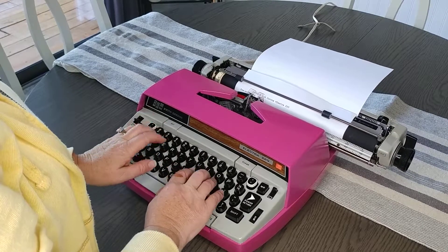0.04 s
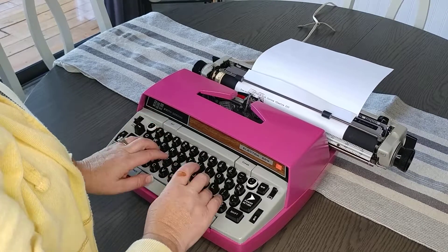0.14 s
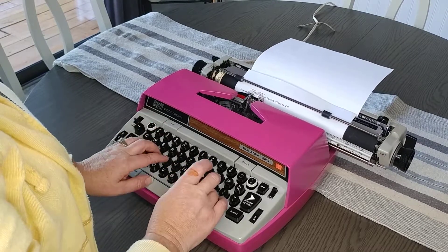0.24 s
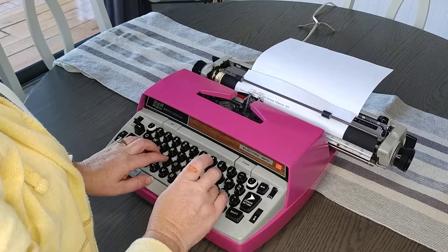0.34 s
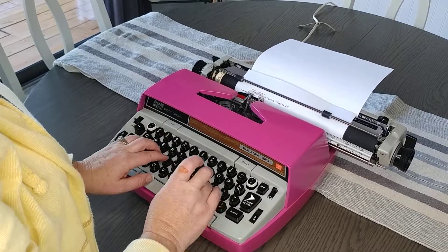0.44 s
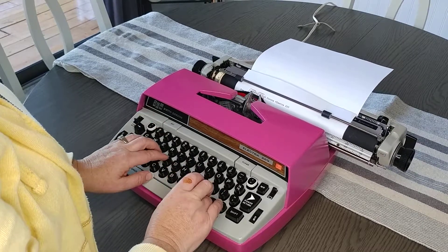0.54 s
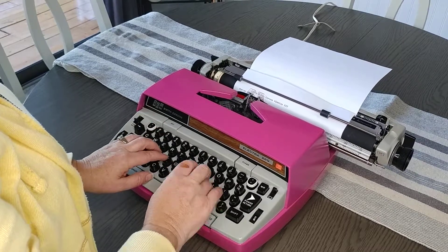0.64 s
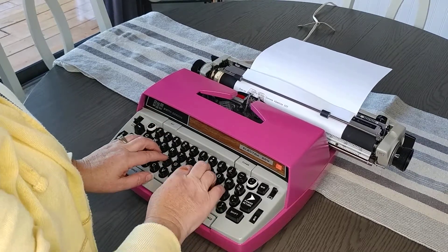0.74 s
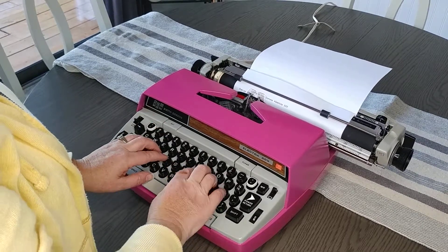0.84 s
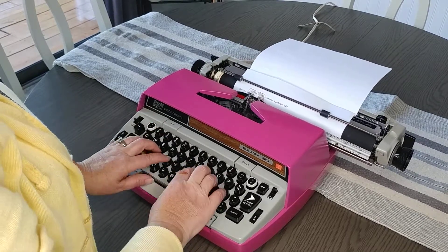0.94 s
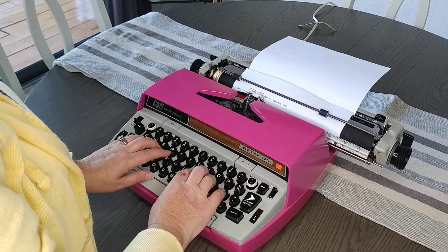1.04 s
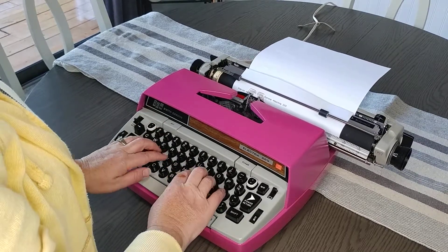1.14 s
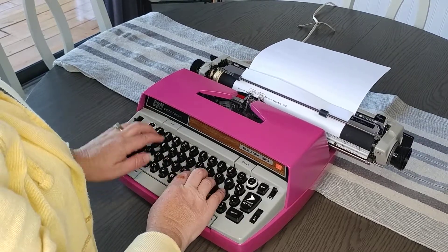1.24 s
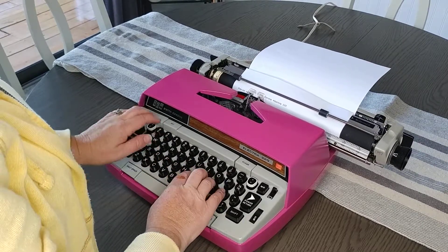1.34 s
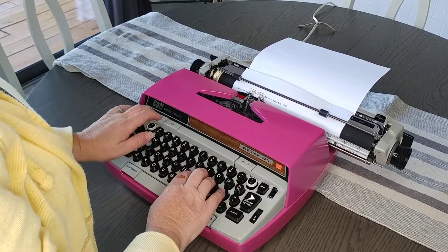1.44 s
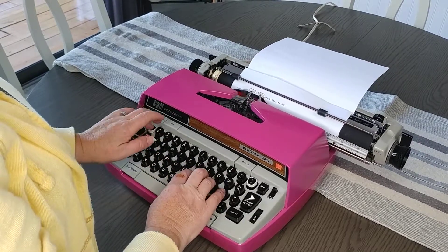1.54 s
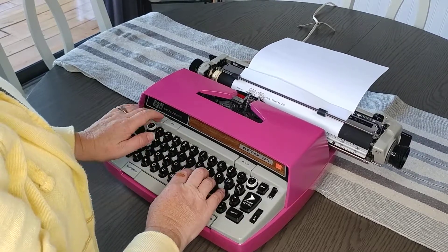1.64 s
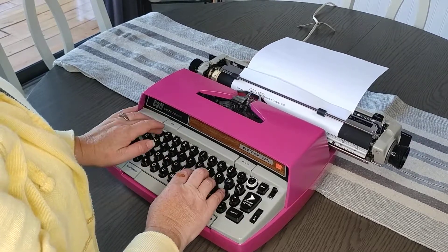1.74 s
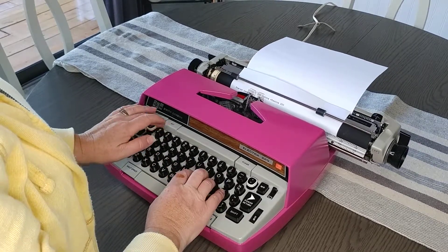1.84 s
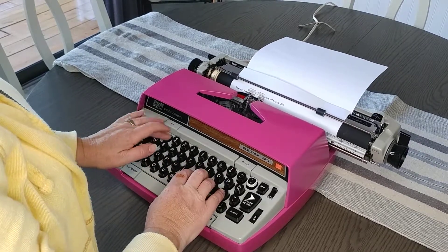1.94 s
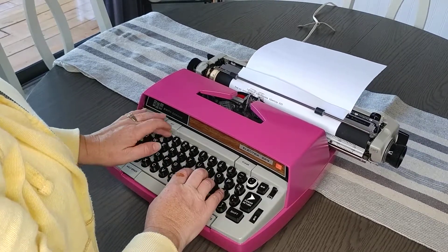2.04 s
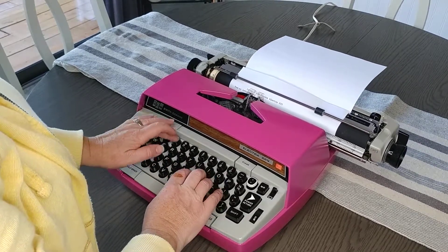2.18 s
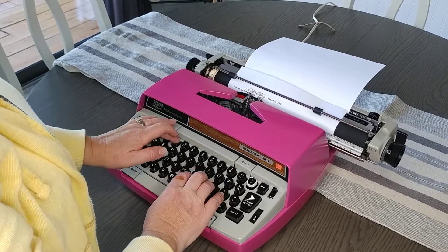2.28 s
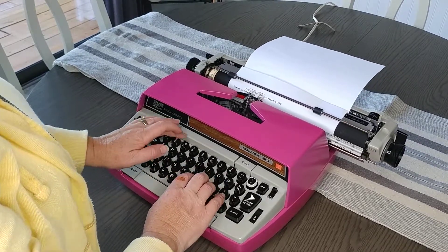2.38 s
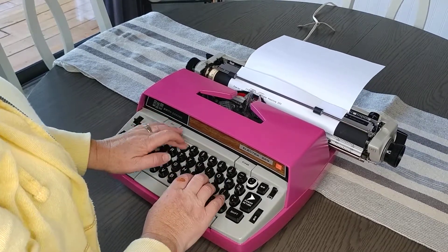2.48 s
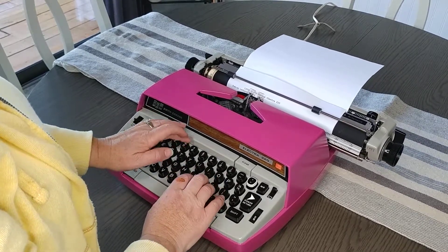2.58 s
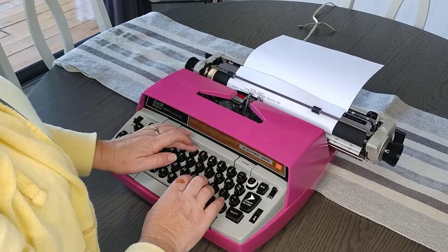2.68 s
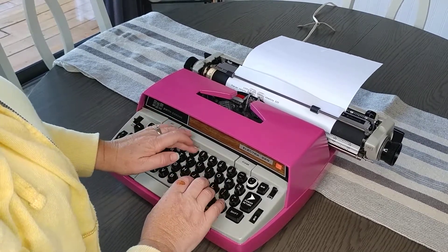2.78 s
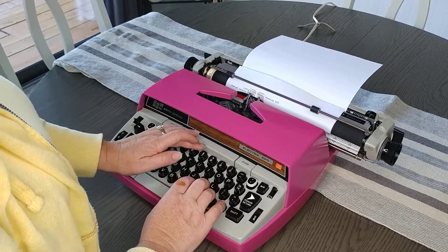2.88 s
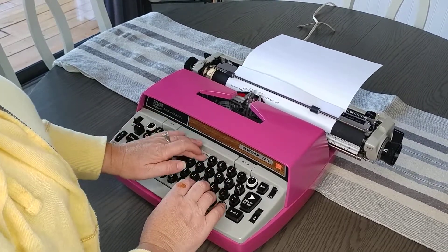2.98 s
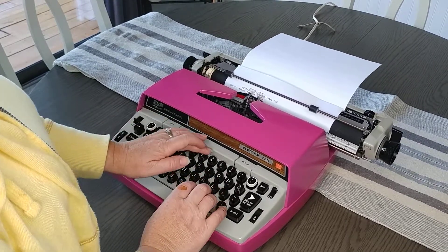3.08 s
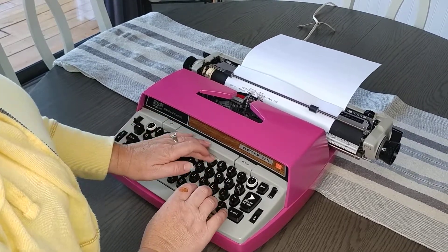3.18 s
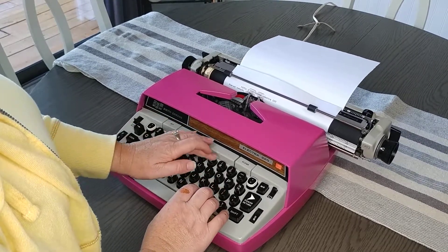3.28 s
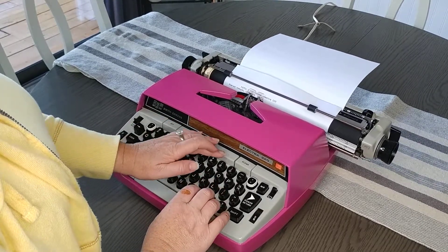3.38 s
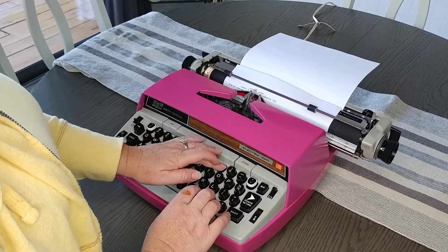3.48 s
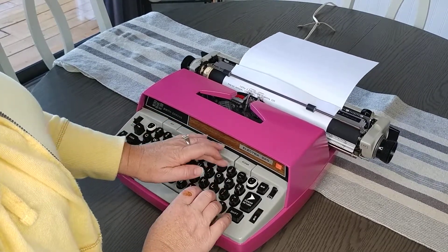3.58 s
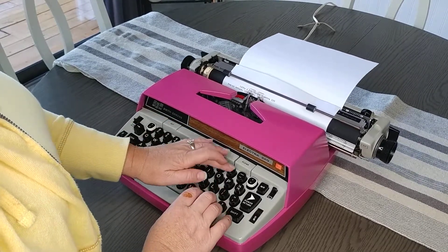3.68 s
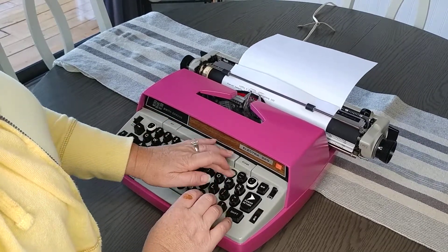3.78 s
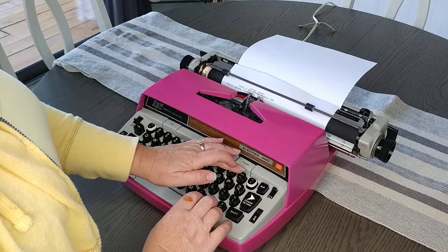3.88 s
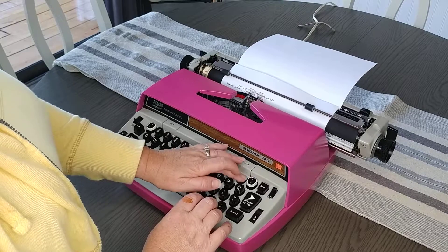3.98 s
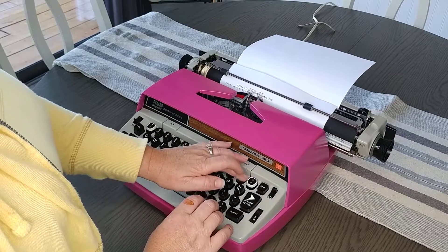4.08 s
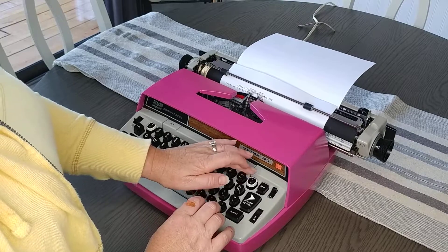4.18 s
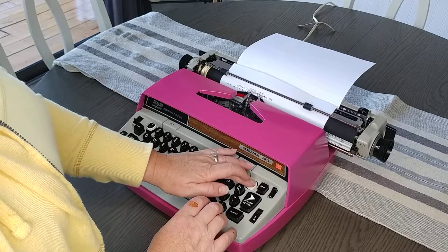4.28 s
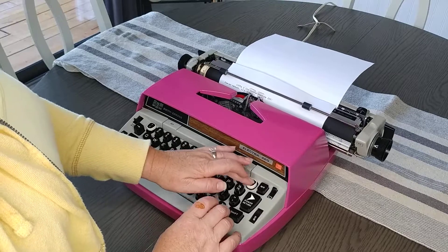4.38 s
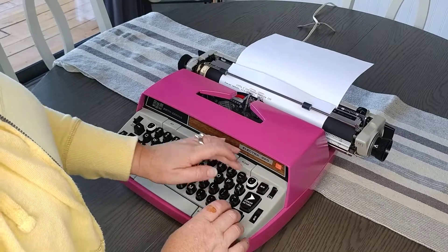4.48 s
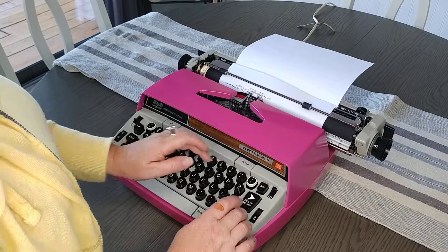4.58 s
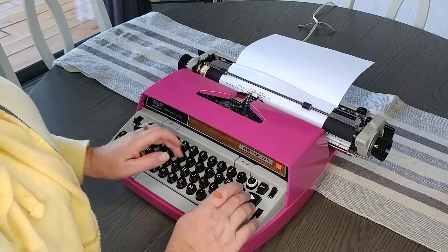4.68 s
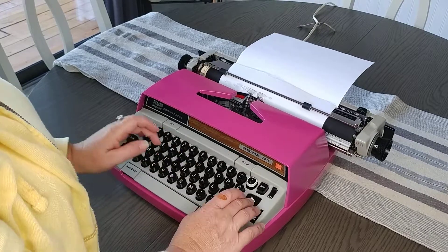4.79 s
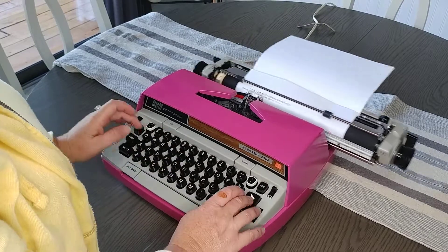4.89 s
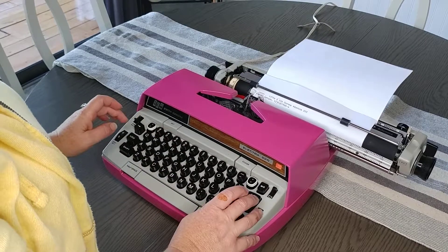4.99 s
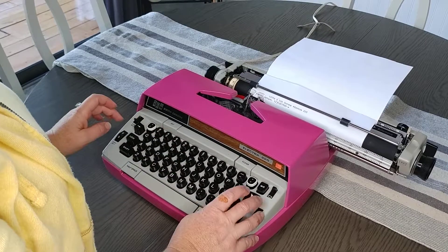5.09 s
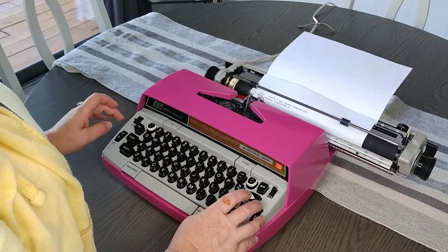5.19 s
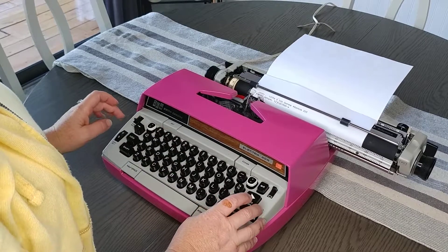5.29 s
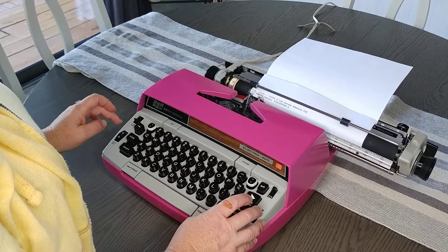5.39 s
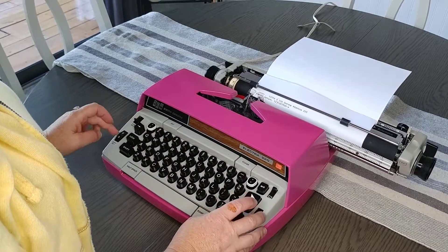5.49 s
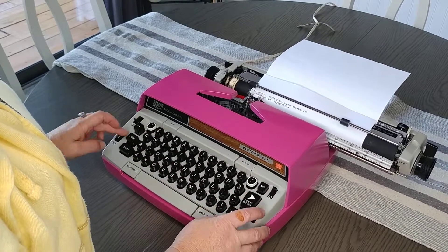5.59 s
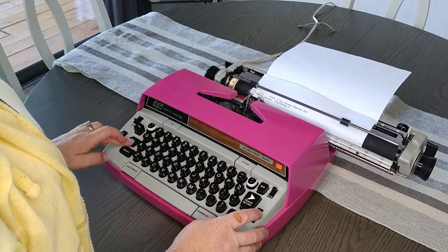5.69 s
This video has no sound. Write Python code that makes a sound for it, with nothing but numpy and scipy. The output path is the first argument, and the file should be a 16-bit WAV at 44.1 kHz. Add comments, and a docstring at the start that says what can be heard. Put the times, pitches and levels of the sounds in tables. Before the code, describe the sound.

Close stereo typing on a humming electric typewriter, bright cracking keystrokes with small table thuds, ending in a heavy, quick motorised carriage return.

```python
"""A steady motor hum under the dying ring of a type bar's slap: an electric typewriter in a quiet, bare room.
Then one letter, a space, a word of twelve letters and the powered carriage return.
Each key trips a cam that throws a type bar at the platen; the carriage steps on and shakes the table.
The lid shields the type bars, so most of the slap arrives by ceiling and walls.
Blows are noise shaped by echoes and part colours; steel, frame and table ring as damped sines."""
import sys
import numpy as np
from scipy import signal
from scipy.fft import rfft, irfft, next_fast_len
from scipy.io import wavfile
from scipy.ndimage import map_coordinates

SR = 44100
rng = np.random.default_rng(int(sys.argv[2]) if len(sys.argv) > 2 else 0)


def store_wav(level_fs):
    """Save 16-bit WAV to argv[1]."""
    pcm = np.round(np.clip(np.atleast_2d(level_fs), -1, 1) * 32767)
    wavfile.write(sys.argv[1], SR, pcm.T.astype(np.int16))


N = 252693  # samples in the scene
LEAD = SR // 4  # samples of run-up, for a stroke that is still ringing at the start
RING = 2 ** 15  # samples in the sound of one blow
HZ = np.fft.rfftfreq(RING, 1 / SR)
AGE = np.arange(RING) / SR  # seconds into a blow
BLOW_SCALE = np.sqrt(SR / 10 / RING)  # takes rms 1 over RING to the energy of a tenth of a second at rms 1


def amp(db):
    """Decibels to gain."""
    return 10 ** (np.asarray(db) / 20)


def unit(x):
    """Scale to rms 1."""
    return x / np.sqrt(np.mean(x ** 2) + 1e-20)


def along(points, hz):
    """(Hz, value) points read on a log axis."""
    f, v = np.transpose(points)
    return np.interp(np.log(hz + 1), np.log(f + 1), v)


def add(track, s, sound):
    """Mix a sound into a track at time s, fading out its far end."""
    part = track[:, LEAD + round(s * SR):][:, :RING]
    faded = sound * np.minimum(1, 10 * (AGE[-1] - AGE))
    part += faded[..., :part.shape[1]]


def wobble(rate):
    """A smooth random curve, rate knots a second."""
    knots = rng.standard_normal(int(N * rate / SR) + 4)
    return map_coordinates(knots, [np.arange(N) * rate / SR])


def ripple(width_hz):
    """A smooth random curve over frequency: resonances that one part does not share with its neighbours."""
    return map_coordinates(rng.standard_normal(400), [HZ / width_hz], mode="mirror")


# How alike the two sides are. Each row: frequency in Hz, left-right likeness (1 is identical).
ALIKE = [(60, 0.94), (130, 0.95), (280, 0.91), (600, 0.63), (1200, 0), (2400, 0), (12000, 0)]


def two_ports(size):
    """White noise at two close microphones: alike in the bass, unrelated in the treble."""
    likeness = along(ALIKE, np.fft.rfftfreq(size, 1 / SR))
    turn = np.arccos(np.clip(likeness, -1, 1)) / 2
    noise = rfft(rng.standard_normal((2, size)))
    mid, side = irfft(noise * [np.cos(turn), np.sin(turn)], size)
    return np.array([mid + side, mid - side])


def rush(spectrum):
    """Steady stereo noise of rms 1."""
    size = next_fast_len(N)
    colour = amp(along(spectrum, np.fft.rfftfreq(size, 1 / SR)))
    return unit(irfft(rfft(two_ports(size)) * colour, size)[:, :N])


# The room's fading. Each row: frequency in Hz, time to fall 60 dB in seconds.
ROOM = [(200, 0.74), (530, 0.52), (1400, 0.45), (3700, 0.37), (9000, 0.29), (13000, 0.24)]
# Room plus ringing type bars. Each row: frequency in Hz, time to fall 60 dB in seconds.
BASKET = [(200, 0.61), (1400, 0.41), (3000, 0.51), (4500, 0.47), (6200, 0.45), (7400, 0.41), (9000, 0.42),
          (13000, 0.28)]
CEILING_S = 0.011  # delay of the ceiling's echo


def path(decay, direct_db, early_db, ceiling_db, contact=0.0012, blur=0.0077):
    """One contact as heard in the room: a direct snap, near echoes, the ceiling, then the tail."""
    hz, t, z = signal.stft(two_ports(RING), SR, nperseg=256)
    fading = amp(-60 * t / along(decay, hz)[:, None])
    tail = signal.istft(z * fading, SR, nperseg=256)[1][:, :RING]
    direct = amp(direct_db) * np.exp(-(AGE / contact) ** 4)
    arrived = (1 + np.tanh((AGE - CEILING_S) / blur)) / 2
    near = amp(early_db) * (1 - arrived)
    echoes = arrived * (1 + amp(ceiling_db) * np.exp(-abs(AGE - CEILING_S) / 0.004))
    return unit(tail * (direct + near + echoes))


# Resonances of frame and case. Each row: frequency in Hz, width in Hz, height in dB over the broad response.
CASE = [(388.8, 50, 0), (492, 134, 5), (820, 47, 7), (1164, 73, 3), (1510, 240, 1.5), (1694, 53, 5.5),
        (2757, 470, 4)]


def body(spectrum, knock_db=0):
    """Gain of a part mounted in the resonant case; a heavier knock drives lows and low mids harder."""
    bumps = sum(db / (1 + (2 * (HZ - hz) / width) ** 2) for hz, width, db in CASE)
    colour = unit(amp(along(spectrum, HZ) + bumps))
    return colour * amp(knock_db / (1 + (HZ / 1600) ** 4))


# Stereo balance of every blow. Each row: frequency in Hz, left minus right in dB.
LEFT = [(500, 0.5), (2500, 0), (5000, 0.8), (8500, 2.5), (12000, -0.5)]


def blow(route, gain):
    """A contact with a causal colour; at unit gain its energy equals a tenth of a second at rms 1."""
    # folding the cepstrum gives the gain minimum phase, so nothing sounds before the contact
    cepstrum = irfft(np.log(np.maximum(gain, 1e-6)))
    cepstrum[1:RING // 2] *= 2
    cepstrum[RING // 2 + 1:] = 0
    balance = amp(np.array([[.5], [-.5]]) * along(LEFT, HZ))
    return irfft(rfft(route) * np.exp(rfft(cepstrum)) * balance) * BLOW_SCALE


def ring(modes, attack, scatter_db):
    """Damped modes of (Hz, dB, t60 s); each blow scatters their strengths by scatter_db."""
    tones = 0
    for hz, db, t60 in modes:
        level = amp(db + scatter_db * rng.normal() - 60 * AGE / t60)
        tones = tones + level * np.sin(2 * np.pi * hz * AGE)
    return tones * (1 - np.exp(-AGE / attack))


# Hum of motor and drive. Each row: frequency in Hz, level in dB rms before its slow wobble.
HUM = [(59.6, -50), (120, -48), (182, -58), (240, -63.5), (520, -70.5), (1032, -82)]
# Colour of drive rumble and room air. Each row: frequency in Hz, level in dB per Hz.
AIR = [(12, -4.5), (25, -2.5), (40, -6), (70, -11.5), (100, -21), (200, -18), (300, -27.5), (500, -29.5),
       (700, -34.5), (1000, -41), (2000, -49.5), (3500, -54), (9000, -55), (11000, -63.5)]
AIR_DB = -43.5


def motor():
    """Steady hum lines over the rumble of the drive and the room's air."""
    t = np.arange(N) / SR
    lines = 0
    for hz, db in HUM:
        level = amp(db + 1.1 * wobble(21))
        phase = 2 * np.pi * (hz * t + rng.random()) + 0.24 * wobble(7.7)
        lines = lines + level * np.sin(phase)
    return np.sqrt(2) * lines + amp(AIR_DB) * rush(AIR)


# Type bars hitting the platen. Each row: slap time in seconds, level in dB, extra steel ring in dB.
STROKES = [(-.1, -16.5, -2), (0.654, -20, -11), (1.613, -16.5, -0.5), (1.8253, -14.5, 1.5),
           (2.084, -15, 0.5), (2.3291, -15.5, -0.3), (2.5735, -14, -1), (2.832, -13.5, -0.5),
           (3.078, -14.5, 0), (3.322, -14.5, -1.1), (3.5815, -14.5, -1.5), (3.8553, -16.5, -1),
           (4.117, -19, -5.5), (4.3993, -16, -7)]
# Colour of keys and levers. Each row: frequency in Hz, level in dB per Hz.
LEVERS = [(60, 4.5), (200, -4), (500, -4), (1200, -1), (2000, -3.5), (3500, -4), (7000, -7), (9000, 1),
          (10500, -14.5), (12000, -8.5), (15500, -13.5)]
KEY_LEAD_S, KEY_DB, KEY_KNOCK_DB = .0325, -42, -2  # an unhurried key: lead on the slap, level, woodiness
HURRY_GAP_S, HURRY_POWER = .213, 11  # a key this soon after the last is fully hurried; fading for longer gaps
HURRY_DB, HURRY_KNOCK_DB = 6, 7.5  # what full hurry adds to level and woodiness


def keys(track):
    """A finger knocks the key down just before its bar lands; the sooner after the last, the firmer and woodier."""
    times = np.transpose(STROKES)[0]
    gaps = np.diff(times, prepend=-np.inf)
    hurries = np.minimum(1, HURRY_GAP_S / gaps) ** HURRY_POWER
    for s, hurry in zip(times, hurries):
        route = path(ROOM, direct_db=-9, early_db=6, ceiling_db=-15)
        gain = body(LEVERS, KEY_KNOCK_DB + HURRY_KNOCK_DB * hurry)
        add(track, s - KEY_LEAD_S, amp(KEY_DB + HURRY_DB * hurry) * blow(route, gain))


# Type bars ringing in their basket. Each row: frequency in Hz, relative level in dB.
STEEL = [(5136, -43), (5211, -50), (5464, -47.5), (5615, -41.5), (5722, -42.5), (5927, -45.5), (6158, -32),
         (6202, -44), (6934, -51), (7946, -43.5), (8075, -36.5), (8581, -41.5), (8829, -47), (9033, -45.5),
         (9179, -52), (9615, -39.5)]


def steel_ring(t60, scatter_db):
    """The bars' thin lines, at new strengths in each ear; energy of a tenth of a second at rms 1."""
    hz, db = np.transpose(STEEL)
    tones = np.sin(2 * np.pi * (hz[:, None] * AGE + rng.random((len(hz), 1))))
    strengths = amp(db + scatter_db * rng.standard_normal((2, len(hz))))
    pair = strengths * rng.choice([-1, 1], (2, len(hz))) @ tones
    swell = 1 - np.exp(-AGE / 0.025)
    return unit(pair * amp(-60 * AGE / t60) * swell) * BLOW_SCALE


# Colour of a slap. Each row: frequency in Hz, level in dB per Hz.
SLAP = [(60, -25), (200, -26.5), (600, -22), (2200, -14.5), (3000, -11.5), (4300, -10), (5300, -4),
        (6150, 0.5), (7200, -7), (8400, 1.5), (9500, -3.5), (10600, -24), (11600, -16.5), (15500, -17)]
SNAP_DB = -26.5  # type meeting paper: the motor throws every bar equally hard
SNAP_ECHO_S, SNAP_ECHO_DB, SNAP_SPREAD_S = .0135, -10, 0.0031  # snap off the ceiling: delay, level, smear


def type_bars(track):
    """All bars strike the same spot, so slaps share snap and echo pattern; each bar has its own colour."""
    platen = path(BASKET, direct_db=-5, early_db=-9, ceiling_db=-1, blur=.0015)
    steel = np.exp(-((HZ - 8700) / 1400) ** 2)
    echo = amp(SNAP_ECHO_DB) * np.exp(-((AGE - SNAP_ECHO_S) / SNAP_SPREAD_S) ** 2)
    snap = np.exp(-(AGE / .0013) ** 4) + echo
    for s, db, steel_db in STROKES:
        own_path = path(BASKET, direct_db=-4.5, early_db=-16.5, ceiling_db=-8.5)
        route = unit(platen + 0.82 * own_path)
        own_db = 1.3 * ripple(width_hz=260)
        add(track, s, amp(db) * blow(route, body(SLAP) * amp(steel_db * steel + own_db)))
        add(track, s, amp(db + steel_db - 14.5) * steel_ring(t60=0.39, scatter_db=-0.5))
        add(track, s, amp(SNAP_DB) * blow(unit(two_ports(RING) * snap), body(SLAP)))


CHATTER_DB, CHATTER_DB_PER_S = -23.5, 130.5  # level against the slap, fading
CHATTER_FROM_S, CHATTER_TO_S = .012, .11  # span after the slap


def chatter(track, count):
    """Each slap shakes loose levers, which tick a few times at random while it dies away."""
    gain = body(SLAP)
    for s, db, _ in STROKES:
        ticks = np.zeros((2, RING))
        for late in rng.uniform(CHATTER_FROM_S, CHATTER_TO_S, count):
            ticks += amp(-CHATTER_DB_PER_S * late) * np.exp(-((AGE - late) / .0005) ** 2)
        route = unit(ticks * two_ports(RING))
        add(track, s, amp(db + CHATTER_DB) * np.sqrt(count) * blow(route, gain))


# Machine on its feet and table top. Each row: frequency in Hz, level in dB, time to fall 60 dB in seconds.
TABLE = [(33.56, -25.5, 0.32), (54.6, -21, 0.14), (94.1, -40.5, 0.21), (134.6, -34, 0.24),
         (180.5, -38.5, 0.31)]


def thud(hard_db=0):
    """The machine rocks on its feet; a hard jolt drives the table's higher modes harder."""
    modes = [(hz, db + hard_db * (hz > 80), t60) for hz, db, t60 in TABLE]
    return -ring(modes, attack=0.0028, scatter_db=0.0)


# Trip lever, cam, ribbon lift, escapement, carriage stop, bar falling back.
# Each row: typical delay from the slap in seconds, typical level in dB, knock in dB.
LINKAGE = [(-.022, -45.5, 3), (-.014, -39, -9), (-.004, -37, -1.5), (.036, -32, 1), (.053, -31.5, -1),
           (.082, -40, -5.5)]
STEP_S = .064  # from a slap or a press of the space bar to the thud of the carriage's step


def linkage(track):
    """Levers click before and after each slap, each with its own knock; the carriage steps with a thud."""
    for delay, db, knock_db in LINKAGE:
        lever = path(ROOM, direct_db=-1.5, early_db=6.0, ceiling_db=4.5)
        for s, *_ in STROKES:
            own_path = path(ROOM, direct_db=-1.0, early_db=4.5, ceiling_db=-3.0)
            route = unit(lever + 0.66 * own_path)
            late = delay * (1 + .07 * rng.normal())
            own = amp(2.2 * ripple(width_hz=150))
            level = amp(db + 1.3 * rng.normal())
            add(track, s + late, level * blow(route, own * body(LEVERS, knock_db)))
    for s, *_ in STROKES:
        add(track, s + STEP_S + 0.0011 * rng.normal(), thud())


# A fingertip landing on a key. One row: start in seconds, level in dB.
TOUCH = (.599, -57)


def fingertip(track):
    """Before the next letter a fingertip lands on its key: a faint, quickly damped contact."""
    s, db = TOUCH
    route = unit(path(ROOM, direct_db=2, early_db=-3, ceiling_db=-9.5) * amp(-200 * AGE))
    add(track, s, amp(db) * blow(route, body(LEVERS, knock_db=-3.5)))


def bounces(s, db, knock_db, flight_s, loss_db, duller_db, count):
    """A contact and its rebounds, each weaker and duller: rows of (s, dB, knock dB)."""
    return [(s + k * flight_s, db - k * loss_db, knock_db + k * duller_db) for k in range(count)]


# Space bar pressed, then stopped by the carriage's step. Each row: start in seconds, level in dB, knock in dB.
SPACE = [(1.0327, -45.5, 1.5), (1.0909, -43, 4)]
SPACE_BOUNCE_S, SPACE_LOSS_DB, SPACE_DULLER_DB = .01, 2, 3.5  # its one bounce: flight, loss, added knock
SPACE_THUD_DB = -3


def space_bar(track):
    """The carriage steps without a type bar: light, hollow knocks of the long plastic bar, and the thud."""
    hollow = amp(5 / (1 + ((HZ - 1450) / 350) ** 2))
    for knock in SPACE:
        for s, db, knock_db in bounces(*knock, SPACE_BOUNCE_S, SPACE_LOSS_DB, SPACE_DULLER_DB, count=2):
            route = unit(path(ROOM, direct_db=-2, early_db=1.5, ceiling_db=-4.0) * amp(-70 * AGE))
            add(track, s, amp(db) * blow(route, hollow * body(LEVERS, knock_db)))
    add(track, SPACE[0][0] + STEP_S, amp(SPACE_THUD_DB) * thud())


# Colour of the carriage. Each row: frequency in Hz, level in dB per Hz.
CARRIAGE = [(150, -12.5), (350, -11.5), (600, -10), (900, -6.5), (1500, -5.5), (2000, -6.5), (2900, -9.5),
            (4000, -6.5), (6700, -7), (8700, 0.5), (10600, -13), (12700, -14), (15500, -16)]
# Carriage frame, rung by every clack.
# Each row: frequency in Hz, typical level in dB over the clack, time to fall 60 dB in seconds.
FRAME = [(378, -7.5, 0.089), (820, -2, 0.034), (1200, -2, .06), (1440, 2.5, 0.05)]


def clack(track, s, db, knock_db):
    """One contact on the exposed carriage, with a brief ring of its frame."""
    route = path(ROOM, direct_db=-2, early_db=3, ceiling_db=-10.5, contact=0.0039)
    add(track, s, amp(db) * blow(route, body(CARRIAGE, knock_db)))
    add(track, s, amp(db) * ring(FRAME, attack=0.0011, scatter_db=1.5))


# Line feed ratchet. Each row: frequency in Hz, relative level in dB, time to fall 60 dB in seconds.
RATCHET = [(1480, -6, 0.08), (1453, 0, 0.052), (2200, -34, 0.057), (2980, -25.5, 0.066)]
RATCHET_DB = -9.5
LATCH_S, LATCH_DB, LATCH_GROWS_DB, LATCH_KNOCK_DB = .0067, -33.5, 8, -10.5  # spacing, last level, rise a tick, knock
TUG_S, TUG_DB, TUG_LOSS_DB = .0175, 1.5, 3.5  # tugs after the first jolt: spacing, first level, loss a tug
JOLT_S = 0.051  # the table takes the jolt this long after a clack


def clutch(track, count):
    """The latch ticks ever louder until the clutch grabs, ringing the line feed; the draw band then tugs."""
    grab = CLACKS[0][0]
    add(track, grab, amp(RATCHET_DB) * ring(RATCHET, attack=.001, scatter_db=1))
    for k in range(count):
        # ticks are laid backwards from the grab, tugs forwards from the jolt
        clack(track, grab - (k + 1) * LATCH_S, LATCH_DB - k * LATCH_GROWS_DB, LATCH_KNOCK_DB)
        tug = amp(TUG_DB - k * TUG_LOSS_DB) * thud(hard_db=5)
        add(track, grab + JOLT_S + (k + 1) * TUG_S, tug)


# Carriage return: clutch grabbing, carriage meeting the brake, margin stop.
# Each row: start in seconds, level in dB, knock in dB, loss a bounce in dB, jolt in dB.
CLACKS = [(4.853, -22.5, -1.5, 0.5, 9), (5.049, -24, 0.5, 3, 5), (5.0917, -21, 2, 16.5, -2)]
BOUNCE_S, BOUNCE_DULLER_DB = .0105, 1  # flight between a clack's bounces, knock added by each


def carriage_return(track):
    """The carriage clacks as it is pulled away, braked and stopped; each clack bounces and jolts the table."""
    clutch(track, count=3)
    for s, db, knock_db, loss_db, jolt_db in CLACKS:
        for contact in bounces(s, db, knock_db, BOUNCE_S, loss_db, BOUNCE_DULLER_DB, count=3):
            clack(track, *contact)
        add(track, s + JOLT_S, amp(jolt_db) * thud(hard_db=4.5))


SLIDE_DB, SLIDE_GROWS_DB = -31.5, 1.5  # typical rattle at full speed, its rise from rest
WHINE_DB, WHINE_ROUGH = -5, 1.0  # gear whine's peak over the rattle's rms, its phase wander in radians
WHINE_START_HZ, WHINE_FULL_HZ, SPIN_UP_S = 462, 575, 0.078  # the whine follows the carriage's speed


def slide():
    """The carriage gathers speed: rail rattle grows, the gear's rough whine rises; both fade from brake to stop."""
    t = np.arange(N) / SR
    start, brake, stop = np.transpose(CLACKS)[0]
    speed = 1 - np.exp(-np.maximum(t - start, 0) / SPIN_UP_S)
    hz = WHINE_START_HZ + (WHINE_FULL_HZ - WHINE_START_HZ) * speed
    whine = np.sin(2 * np.pi * np.cumsum(hz) / SR + WHINE_ROUGH * wobble(120))
    rattle = amp(2.5 * wobble(250)) * rush(LEVERS)
    moving = np.interp(t, [brake, stop], [1, 0]) * (t > start)
    level = amp(SLIDE_DB + SLIDE_GROWS_DB * (speed - 1))
    return moving * level * (rattle + amp(WHINE_DB) * whine)


def scene():
    """All the blows, the sliding carriage and the motor."""
    track = np.zeros((2, LEAD + N))
    keys(track)
    type_bars(track)
    chatter(track, count=5)
    linkage(track)
    fingertip(track)
    space_bar(track)
    carriage_return(track)
    return track[:, LEAD:] + slide() + motor()


TOP_HZ = 16150  # band limit


def record(dry):
    """The loudest peaks are rounded off at full scale; nothing passes above the band limit."""
    rounded = dry / (1 + dry ** 8) ** (1 / 8)
    size = next_fast_len(N + RING)
    passed = np.clip((TOP_HZ - np.fft.rfftfreq(size, 1 / SR)) / 400, 0, 1)
    return irfft(rfft(rounded, size) * passed, size)[:, :N]


dry = scene()
out = record(dry)
store_wav(out)
```